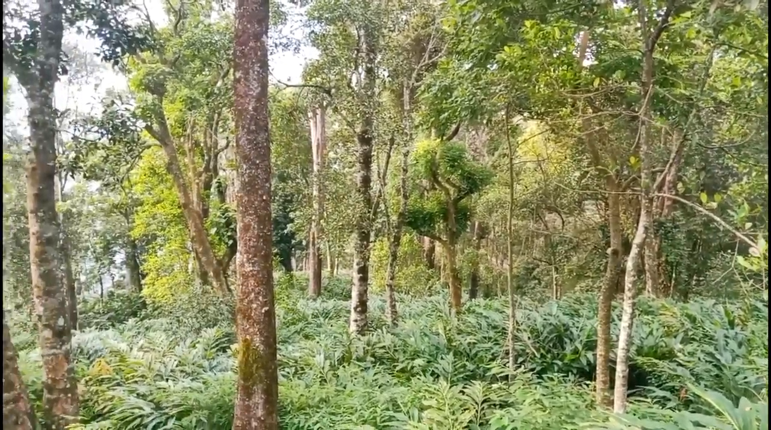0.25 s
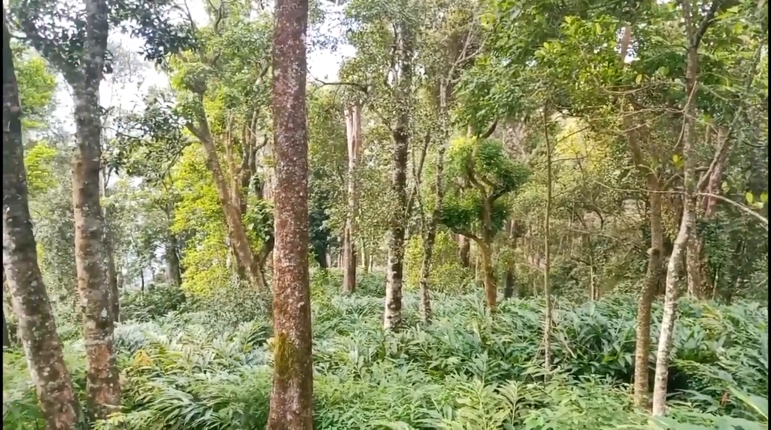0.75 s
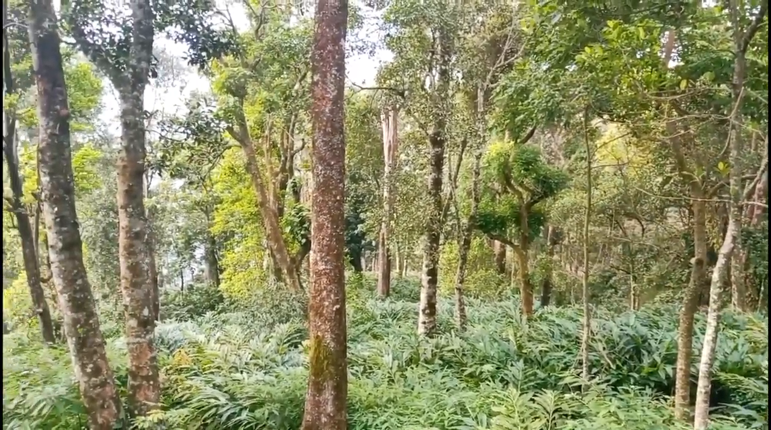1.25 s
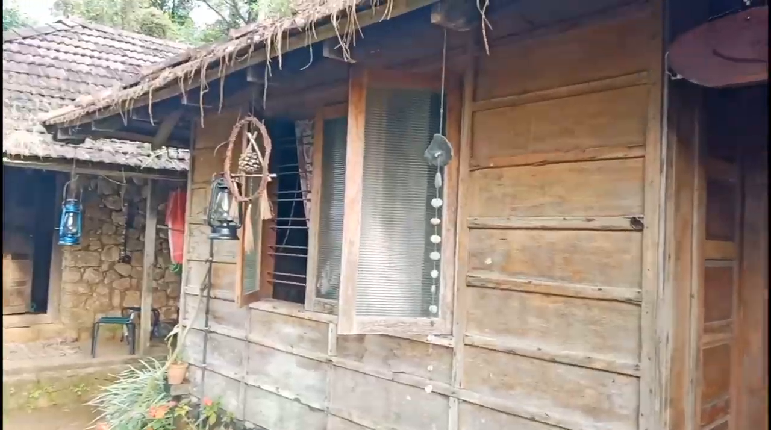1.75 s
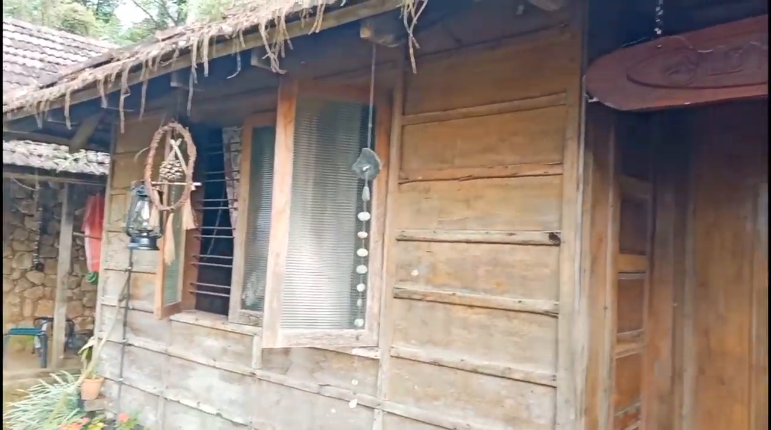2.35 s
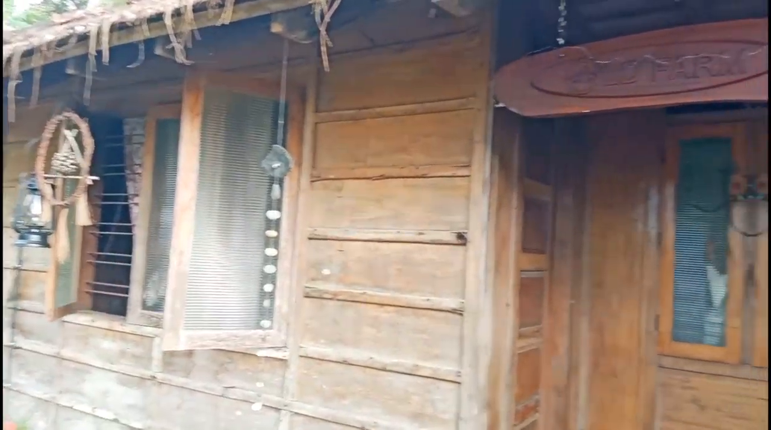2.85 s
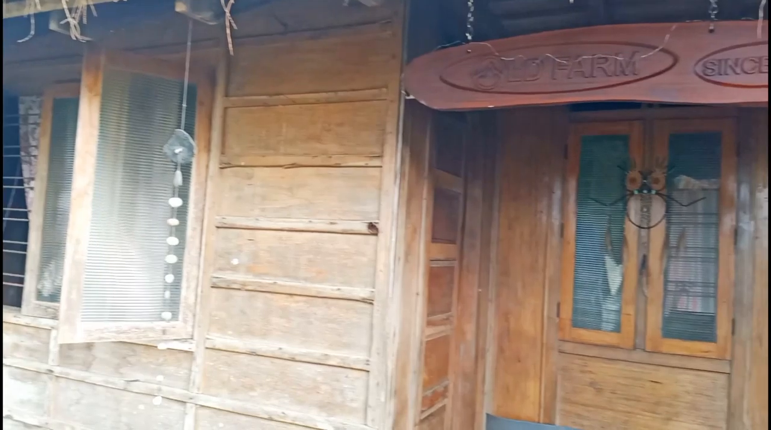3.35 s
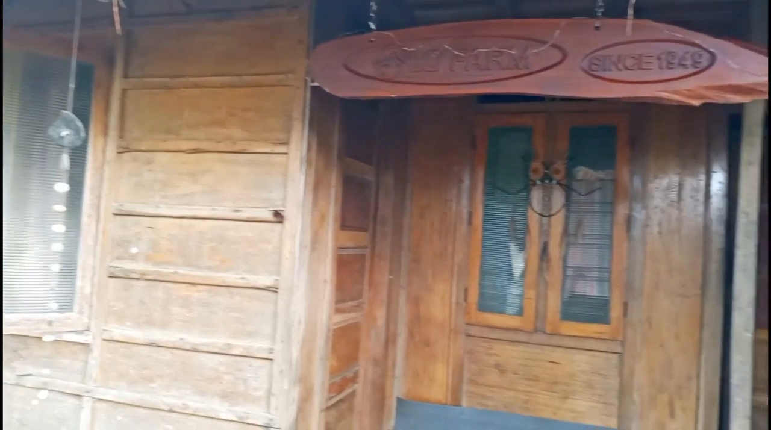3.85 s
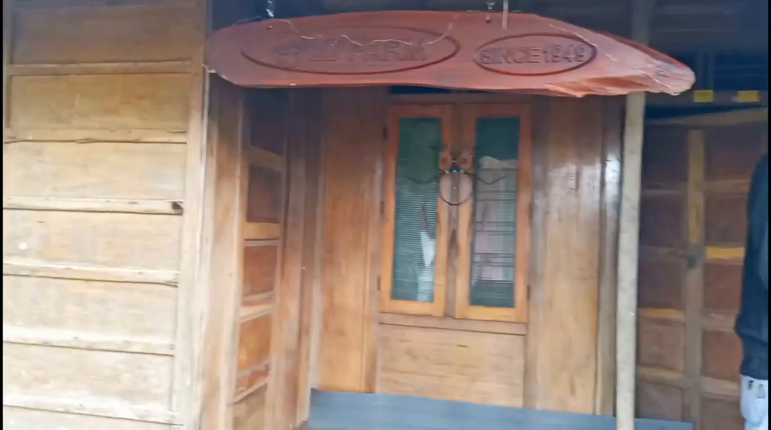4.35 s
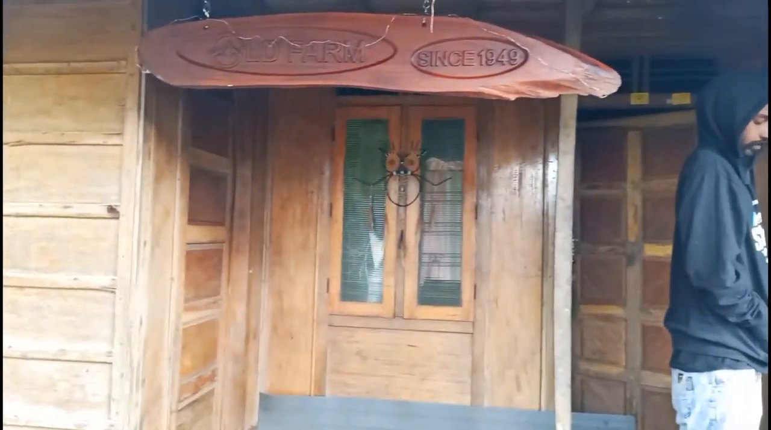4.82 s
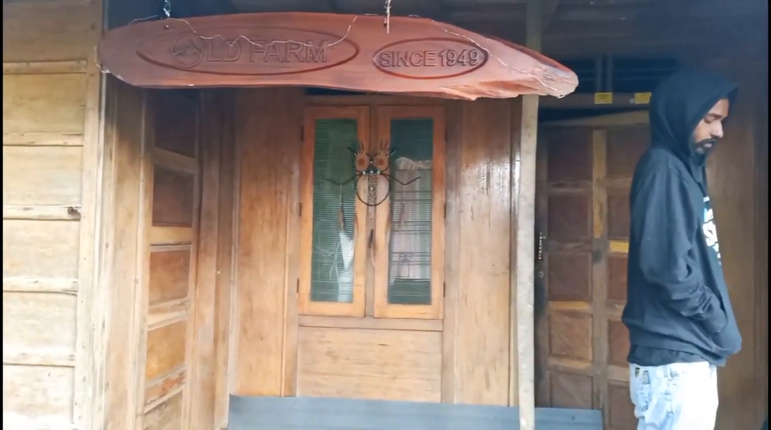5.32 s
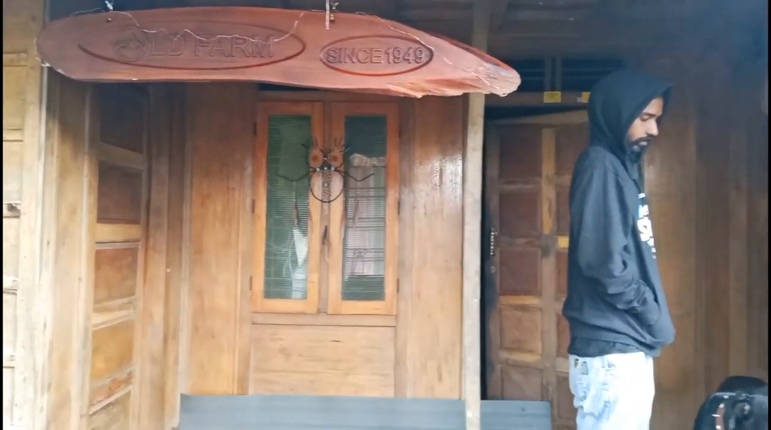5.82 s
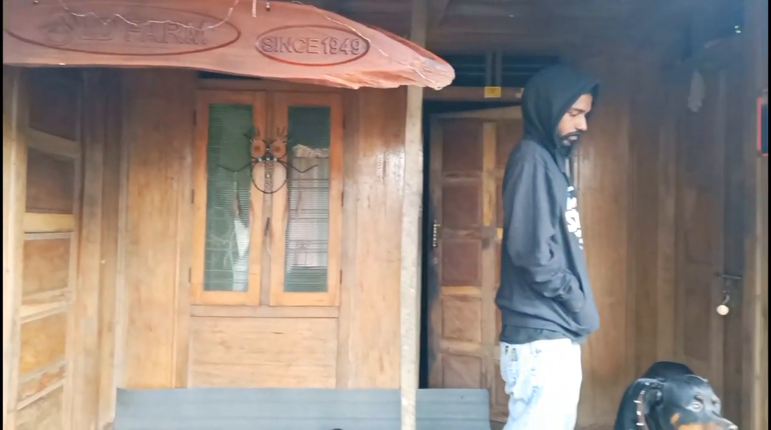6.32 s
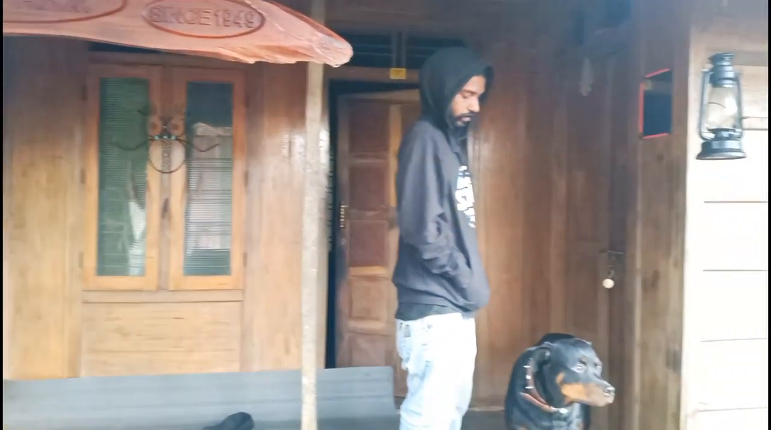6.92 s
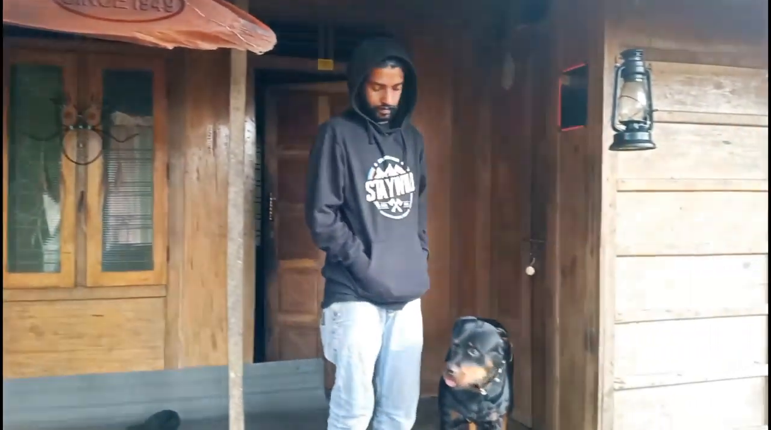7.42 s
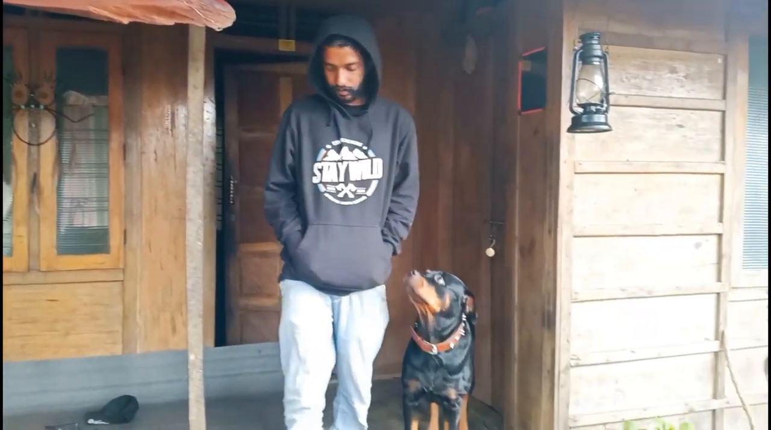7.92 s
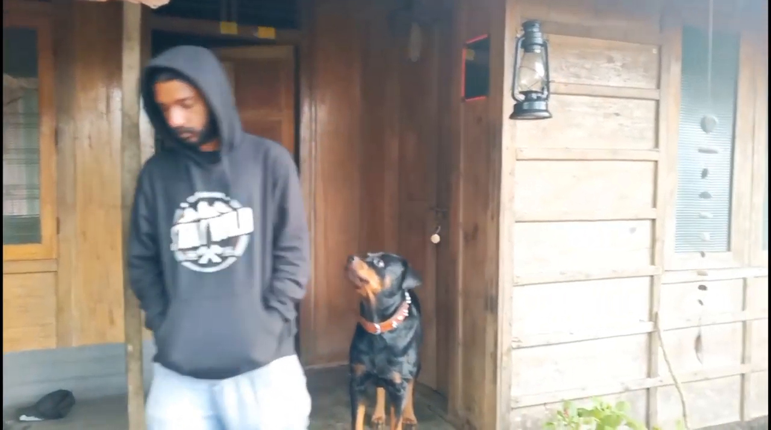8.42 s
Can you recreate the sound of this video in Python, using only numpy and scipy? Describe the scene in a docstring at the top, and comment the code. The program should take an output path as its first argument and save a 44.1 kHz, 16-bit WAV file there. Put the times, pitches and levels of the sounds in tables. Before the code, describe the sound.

Short, high bird calls ring through the woods above a gentle hiss. After an abrupt cut, a quiet yard fades in and a loose plank knocks sharply underfoot, the loudest sound. Soft, irregular footsteps follow, scuffing and ticking on grit, with a very faint rustle of clothes. Distant birds keep whistling, and one repeats a rising phrase three times.

```python
"""Birds call in a forest over a soft hiss; then the scene cuts to a farmhouse yard with more birds.
Someone walks slowly along the wooden house: a loose plank thumps, slaps back and grinds on grit,
then come soft steps, scuffs and small ticks of grit. The birds are gliding sine whistles, the plank
is a set of damped modes, and grit is bursts of grainy noise. Trees and walls scatter calls and steps."""
import sys
import numpy as np
from scipy import signal
from scipy.fft import rfft, irfft, next_fast_len
from scipy.io import wavfile
from scipy.ndimage import map_coordinates

SR = 44100
rng = np.random.default_rng(int(sys.argv[2]) if len(sys.argv) > 2 else 0)


def pcm_store(signal):
    """Save signal as 16-bit PCM."""
    levels = np.round(np.clip(np.atleast_2d(signal), -1, 1) * 32767)
    wavfile.write(sys.argv[1], SR, levels.astype(np.int16).T)


N = 382343

CUT_S = 1.474  # the forest gives way to the yard
# bright top shared by snapping grit and rustling cloth: f/Hz, level/dB
SNAP_EQ = [(3000, -12), (4800, 8.5), (6200, 3.5), (8000, 10), (10500, -8), (13500, 0), (16000, -20)]


def plank():
    """A loose plank thumps under a foot, slaps back and grinds on the grit beneath."""
    # modes of the wood: f/Hz, level/dB, t60/s
    modes = [(228.4, -18.5, 0.34), (260.6, 8, 0.033), (650, -0.5, 0.032), (1000, 8.5, 0.019),
             (1220, -3, 0.022), (2140, 0, 0.019), (3030, -38, 0.0177)]
    # blows on the plank: t/s, level/dB, hardest-driven f/Hz
    blows = [(2.0112, -5, 282), (2.0476, -9.5, 1980), (2.068, -18, 300)]
    # grit crushed under it: t/s, rise/s, fall/s, level/dB
    grinds = [(2.013, 0.0009, 0.13, -22.5), (2.048, 0.00056, 0.08, -16.5), (2.078, 0.015, 0.2, -19.5)]
    # dark crunch of that grit: f/Hz, level/dB
    grind_eq = [(35, -51), (60, -5), (236, -6), (475, -5.5), (829, -5.5), (3420, -15.5), (5710, -40),
                (15500, -50.5)]
    track, t = np.zeros(N), clock(SR // 3)
    for s, db, contact_hz in blows:
        for hz, mode_db, t60 in modes:
            drive = 1 / (1 + np.log2(hz / contact_hz) ** 2)  # harder contacts drive higher modes
            swell = 1 - np.exp(-(t * hz / 1.03) ** 2)  # a mode builds up in about one cycle
            phase = 2 * np.pi * hz * t + 0.29 * wobble(260, len(t))
            add(track, s, amp(db + mode_db - 60 * t / t60) * drive * swell * np.sin(phase))
    for s, rise, fall, db in grinds:
        add(track, s, amp(db) * burst(rise, fall, grind_eq, grain_db=1.5))
    return scattered(track, t60=0.59, wet_db=-13, build_s=0.0051)


def walking():
    """Rustling clothes, hollow footfalls, and grit that ticks and scuffs under the soles."""
    # footfalls: t/s, rise/s, level/dB, ring f/Hz
    steps = [(1.93, 0.073, -37, 450), (2.955, 0.0025, -40, 646), (3.263, 0.0087, -48, 406),
             (3.382, 0.011, -37.5, 510), (3.581, 0.0056, -37.5, 757), (3.602, 0.0034, -39, 500),
             (5.039, 0.0019, -39, 306), (5.62, 0.01, -43.5, 693), (6.5, 0.066, -48, 410),
             (6.9, 0.032, -41.5, 330), (7.09, 0.022, -47, 320), (7.475, 0.0093, -45.5, 273),
             (8.366, 0.00068, -33.5, 1595), (8.38, 0.001, -26.5, 745), (8.392, 0.0076, -34, 662)]
    # quick cracks to slow scuffs: t/s, rise/s, crunch level/dB, snap level/dB
    scuffs = [(1.842, 0.017, -47.5, -58), (2.577, 0.0036, -54, -51), (2.701, 0.017, -49.5, -61.5),
              (3.16, 0.009, -35, -57), (3.238, 0.0034, -42, -53), (3.919, 0.022, -41.5, -53.5),
              (3.962, 0.0054, -39.5, -59), (4.292, .003, -46, -55), (4.484, 0.00088, -36, -46),
              (5.075, .02, -48, -56), (5.517, 0.002, -37, -48.5), (5.816, 0.0034, -40.5, -53.5),
              (6.287, 0.0048, -40, -58.5), (6.588, 0.0074, -37.5, -55.5), (6.88, 0.043, -47.5, -54.5),
              (7.079, 0.033, -48, -58), (7.31, 0.066, -41.5, -57.5), (8.41, 0.00029, -33, -58)]
    track = clothes()
    for s, rise, db, ring_hz in steps:
        add(track, s, amp(db) * footfall(rise, ring_hz))
    for s, rise, crunch_db, snap_db in scuffs:
        add(track, s, grit(rise, crunch_db, snap_db))
    return scattered(track, t60=0.32, wet_db=-6, build_s=0.0039)


def footfall(rise, ring_hz):
    """A dull thud and the hollow ring of what the foot meets; hard knocks die fastest."""
    # body of the thud: f/Hz, level/dB
    thud_eq = [(60, -11), (220, 2), (800, -5), (1700, -9.5), (4200, -21.5), (6000, -43.5)]
    t, fall = clock(SR // 2), 0.044 + 3.6 * rise
    ring = rise_fall(t, rise, fall) * np.sin(2 * np.pi * ring_hz * t + .6 * wobble(170, len(t)))
    return amp(-0.5) * burst(rise, fall, thud_eq, grain_db=2) + ring


def grit(rise, crunch_db, snap_db):
    """Grit crunches with a bright snap on top; slow scuffs also end slowly."""
    # upper-mid crunch: f/Hz, level/dB
    crunch_eq = [(500, -28), (2800, 0.5), (4200, -1.5), (5700, -40), (9000, -33)]
    fall = 0.015 + 6.7 * rise
    crunch = amp(crunch_db) * burst(rise, fall, crunch_eq, grain_db=4)
    return crunch + amp(snap_db) * burst(rise, fall, SNAP_EQ, grain_db=6.3)


def clothes():
    """Cloth rubs in faint, grainy swishes that swell and fade."""
    # swishes: t/s, length/s, level/dB
    swishes = [(4.704, 1.66, -69), (6.343, 0.37, -67.5)]
    swell = np.zeros(N)
    for s, length, db in swishes:
        add(swell, s, amp(db) * np.sin(np.linspace(0, np.pi, int(length * SR))))
    texture = amp(2.5 * wobble(25) + 3 * wobble(400))
    return swell * texture * coloured(rng.standard_normal(N), SNAP_EQ)


def yard_birds(whistles):
    """One bird repeats a rising phrase; others whistle and twitter from deeper in the trees."""
    # notes of the phrase: offset/s, length/s, start f/Hz, middle f/Hz, end f/Hz, level/dB
    phrase = [(0, 0.0262, 1940, 1834, 2220, -2.5), (0.046, 0.0705, 2290, 2428, 2430, -1.5),
              (0.12, 0.049, 2535, 2738, 3040, 2.5), (0.266, 0.031, 1953, 1836, 2350, -0.5),
              (.38, .075, 1600, 2330, 2450, -0.5), (0.47, 0.053, 2500, 2700, 3010, -3)]
    # entries of the phrase: t/s, level/dB
    entries = [(1.671, -44.5), (4.568, -44.5), (6.964, -44.5)]
    song = [(s + offset, length, *pitches, db + note_db)
            for s, db in entries for offset, length, *pitches, note_db in phrase]
    near = notes(song, waver=.03)
    far = scattered(whistles + twitters(), t60=.8, wet_db=2, build_s=.003)
    return amp(-1) * scattered(near, t60=.8, wet_db=-1, build_s=.005) + amp(-2) * far


def twitters():
    """Thin, high calls whose pitch zigzags as it sags."""
    # calls: t/s, centre f/Hz, level/dB
    calls = [(2.425, 7250, -68.5), (2.949, 7890, -59.5), (4.30, 7450, -65.5), (4.454, 7270, -65),
             (4.755, 7860, -60), (4.962, 8020, -57), (5.925, 7600, -67.5)]
    length_s, trill_hz = 0.125, 27
    track, t = np.zeros(N), clock(int(length_s * SR))
    zigzag = 0.0437 * np.cos(2 * np.pi * trill_hz * t)
    sag = 0.0424 * (t / length_s - .5)
    for s, hz, db in calls:
        add(track, s, amp(db) * whistle(hz * (1 + zigzag - sag), waver=.025, flutter_db=3))
    return track


def chips():
    """A near forest bird chips twice: a very fast arched flick of pitch with a raspy edge."""
    # chips: t/s, level/dB
    calls = [(.347, -42.5), (1.006, -40)]
    # sharp rasp: f/Hz, level/dB
    rasp_eq = [(4200, -18.5), (7100, -1.5), (9000, -18.5), (15000, -35)]
    length_s, peak_hz, droop = .007, 7350, .31
    arch = 1 - droop * np.linspace(-1, 1, int(length_s * SR)) ** 2
    chip = 1.15 * burst(.004, .05, rasp_eq, grain_db=1)
    add(chip, 0, whistle(peak_hz * arch, waver=.01, flutter_db=1))
    track = np.zeros(N)
    for s, db in calls:
        add(track, s, amp(db) * chip)
    return scattered(track, t60=0.52, wet_db=2.5, build_s=.002)


def forest_birds(whistles):
    """Far whistles, a low stutter of three falling notes and two thin arcs echo among the trunks."""
    # high arcs: t/s, length/s, start f/Hz, middle f/Hz, end f/Hz
    arcs = [(0.712, 0.074, 4940, 6480, 4360), (0.932, 0.071, 5000, 7100, 8250)]
    spacing_s, note_s, hz, stutter_db, arc_db = .046, 0.0366, 1162, -45.5, -66
    stutter = [(0.95 + k * spacing_s, note_s, hz * 1.12, hz, hz * .88, stutter_db) for k in range(3)]
    calls = notes(stutter + [(*arc, arc_db) for arc in arcs], waver=.02)
    return scattered(calls + amp(-1.5) * whistles, t60=0.99, wet_db=0, build_s=0.0034)


def slurs():
    """Far birds slide their whistles up or down, starting each a little sharp."""
    # slurred whistles: t/s, length/s, middle f/Hz, slide/octaves, level/dB
    slides = [(0, 0.057, 1836, -.43, -53.5), (0.11, 0.04, 3250, -0.2, -51),
              (0.362, 0.046, 3130, -.12, -47.5), (0.616, 0.065, 3554, -0.24, -52),
              (0.82, 0.098, 2477, 0.11, -48), (1.01, 0.052, 4330, 0.33, -47),
              (1.059, 0.096, 3796, -0.51, -43.5), (1.129, 0.1, 3630, -0.091, -44.5),
              (1.408, 0.054, 4015, .08, -46.5), (2.35, 0.043, 1926, 0.044, -51.5),
              (2.883, 0.13, 2980, 0.064, -53), (3.76, 0.082, 2750, -0.14, -56.5),
              (3.846, 0.037, 2470, -.04, -51), (5.619, 0.073, 3086, -.25, -50.5),
              (6.228, 0.04, 3930, 0.25, -54.5), (6.48, 0.028, 2472, -0.052, -45),
              (6.724, 0.061, 3170, -.17, -57), (7.634, 0.03, 2595, -0.21, -46.5),
              (7.918, 0.026, 2464, -0.026, -49.5), (8.138, 0.054, 3115, -0.3, -50)]
    onset_ratio = 1.0306
    rows = [(s, length, hz * 2 ** (-slide / 2) * onset_ratio, hz, hz * 2 ** (slide / 2), db)
            for s, length, hz, slide, db in slides]
    return notes(rows, waver=.02)


def chorus(course, spread):
    """Far birds warble in bouts around a drifting pitch; echoes among the trees blur the notes."""
    s, db, hz = np.transpose(course)
    spacing_s, note_s, bout_s, swing_db = .04, .05, .215, 8
    starts, chirps = np.arange(0, N / SR, spacing_s), []
    for start, (late, high) in zip(starts, rng.uniform(-1, 1, (len(starts), 2))):
        pitch = np.interp(start, s, hz) * np.exp(spread * high)
        glide = pitch * (1 + spread / 2), pitch, pitch * (1 - spread / 2)
        bout_db = swing_db * np.cos(2 * np.pi * start / bout_s)
        chirps.append((start + .02 * late, note_s, *glide, bout_db))
    wash = scattered(notes(chirps, waver=.02), t60=.7, wet_db=4, build_s=.006)
    return amp(np.interp(clock(N), s, db)) * unit(wash)


def forest_bed():
    """The wavering hiss of the woods, a faint steady whine and distant warbling."""
    # forest air: f/Hz, level/dB
    air_eq = [(25, -5.5), (160, 0), (800, -13.5), (1100, -8.5), (1450, -17), (3500, -10.5), (5900, -35),
              (7400, -27.5), (9200, -44.5), (15000, -51)]
    # course of the far chorus: t/s, level/dB, centre f/Hz
    warble = [(0, -59.5, 3600), (.45, -49.5, 3570), (1.45, -48.5, 3627)]
    air = amp(-48 + 2.3 * wobble(5.9)) * coloured(rng.standard_normal(N), air_eq)
    whine = amp(-83) * np.sin(2 * np.pi * 14352 * clock(N))
    return air + whine + chorus(warble, spread=.105)


def yard_bed():
    """Soft outdoor hiss with a far, wavering hum and distant warbling."""
    # yard air: f/Hz, level/dB
    air_eq = [(25, -22), (85, -3.5), (150, -1), (400, -10.5), (900, -16.5), (1120, -11), (1400, -19.5),
              (2600, -14.5), (4500, -23), (5900, -39.5), (8000, -33.5), (10500, -49.5), (14000, -44.5)]
    # course of the far chorus: t/s, level/dB, centre f/Hz
    warble = [(1.9, -68, 3500), (2.25, -50, 3254), (2.7, -61, 3147), (4.1, -62, 2560), (4.6, -64.5, 3514),
              (6.9, -60.5, 3565), (7.95, -53.5, 3445), (8.35, -63, 3300)]
    hum = np.sin(2 * np.pi * 86 * clock(N) + 0.72 * wobble(3.9)) * amp(-5 + 3.2 * wobble(2.5))
    air = coloured(rng.standard_normal(N), air_eq)
    return amp(-50.5) * (air + hum) + chorus(warble, spread=0.0752)


def notes(rows, waver):
    """Whistles that each bend through three pitches."""
    track = np.zeros(N)
    for s, length, start_hz, middle_hz, end_hz, db in rows:
        bend = np.polyfit([-1, 0, 1], [start_hz, middle_hz, end_hz], 2)
        pitch_hz = np.polyval(bend, np.linspace(-1, 1, int(length * SR)))
        add(track, s, amp(db) * whistle(pitch_hz, waver, flutter_db=3))
    return track


def whistle(pitch_hz, waver, flutter_db):
    """One pure note of a syrinx, slightly unsteady in pitch and strength."""
    count = len(pitch_hz)
    phase = 2 * np.pi * np.cumsum(pitch_hz * (1 + waver * wobble(300, count))) / SR
    envelope = signal.windows.tukey(count, .4) * amp(flutter_db * wobble(90, count))
    return unit(np.sin(phase) * envelope)


def burst(rise, fall, eq, grain_db):
    """A rush of tiny contacts swells and dies; the envelope alone sets its energy."""
    t = clock(SR // 2)
    grains = rng.standard_normal(len(t)) * amp(grain_db * wobble(884, len(t)))
    envelope = rise_fall(t, rise, fall)
    return unit(coloured(grains, eq) * envelope) * np.sqrt(np.mean(envelope ** 2))


def scattered(x, t60, wet_db, build_s):
    """Direct sound plus echoes from trunks and walls; the paths change from moment to moment."""
    t, out, hop = clock(SR), x.copy(), SR // 3
    for start in range(0, N, hop):
        tail = rng.standard_normal(SR) * amp(-60 * t / t60) * (1 - np.exp(-t / build_s))
        echoes = signal.fftconvolve(x[start:start + hop], tail / np.linalg.norm(tail))
        add(out, start / SR, amp(wet_db) * echoes)
    return out


def rise_fall(t, rise, fall):
    """A linear attack, then a decay of 60 dB every fall seconds."""
    return np.minimum(t / rise, 1) * amp(-60 * np.maximum(t - rise, 0) / fall)


def coloured(x, eq):
    """Shape x with an EQ curve of (f/Hz, level/dB) points, at rms 1."""
    hz, db = np.transpose(eq)
    size = next_fast_len(len(x))
    gain = amp(np.interp(np.log(np.fft.rfftfreq(size, 1 / SR) + 1), np.log(hz), db))
    return unit(irfft(rfft(x, size) * gain, size)[:len(x)])


def wobble(rate, count=N):
    """A smooth random curve, rate knots a second."""
    return map_coordinates(rng.standard_normal(int(count * rate / SR) + 4), [clock(count) * rate])


def add(track, s, sound):
    """Mix a sound into a track at time s."""
    part = track[max(0, round(s * SR)):][:len(sound)]
    part += sound[:len(part)]


def amp(db):
    """Decibels to gain."""
    return 10 ** (np.asarray(db) / 20)


def unit(x):
    """Scale to rms 1."""
    return x / np.sqrt(np.mean(x ** 2) + 1e-20)


def clock(count):
    """Times of count samples."""
    return np.arange(count) / SR


def scene():
    """The forest ends on a hard cut and the yard fades in."""
    t, whistles, fade_s = clock(N), slurs(), 0.26
    in_forest = t < CUT_S
    fade_in = np.clip((t - CUT_S) / fade_s, 0, 1)
    yard = yard_bed() + yard_birds(whistles * ~in_forest) + plank() + walking()
    forest = chips() + forest_birds(whistles) + forest_bed()
    return (in_forest * forest + fade_in * yard)[None]


def record(dry):
    """A gentle high-pass clears away the deepest bass, and the recorder's hard band limit removes the very top."""
    low_cut_hz, top_hz = 45, 15700
    thin = signal.sosfilt(signal.butter(2, low_cut_hz, "high", fs=SR, output="sos"), dry)
    size = next_fast_len(N + SR // 2)
    passband = np.fft.rfftfreq(size, 1 / SR) < top_hz
    return irfft(rfft(thin, size) * passband, size)[:, :N]


dry = scene()
out = record(dry)
pcm_store(out)
```